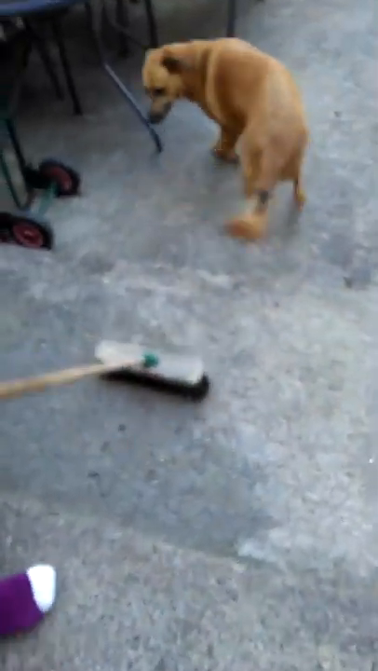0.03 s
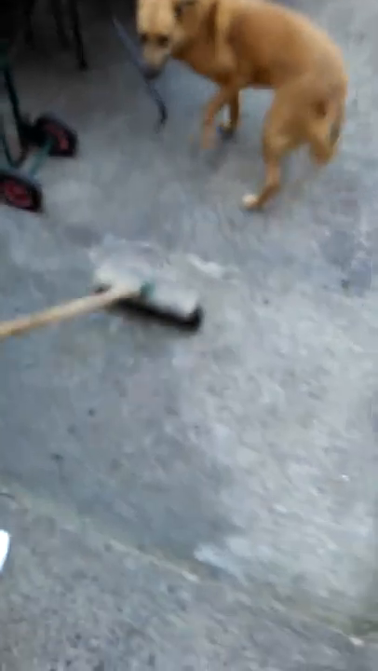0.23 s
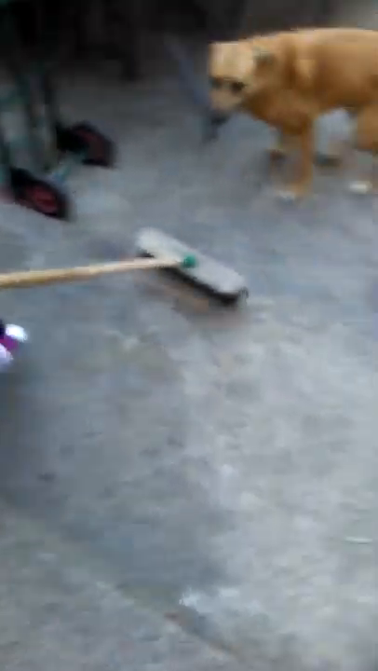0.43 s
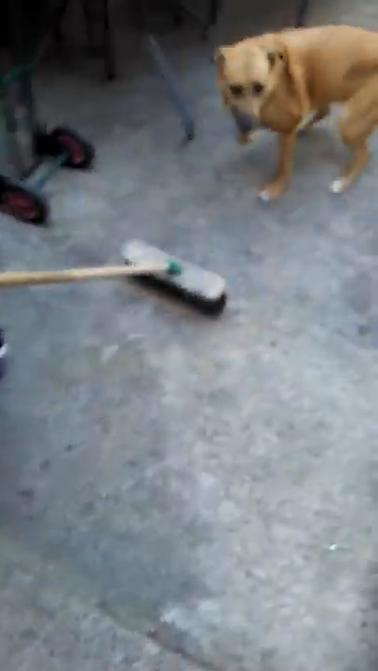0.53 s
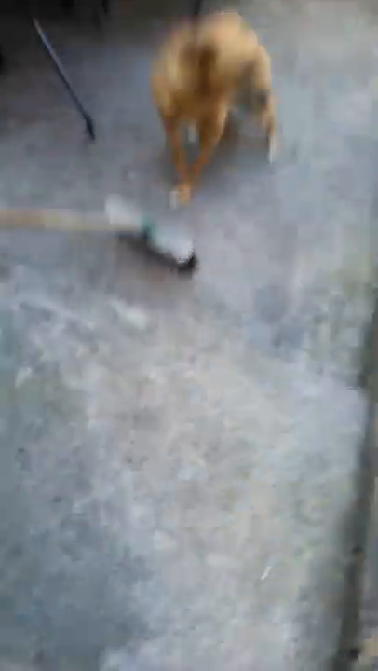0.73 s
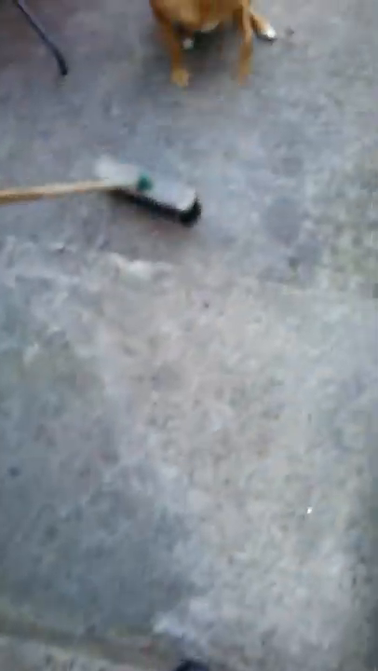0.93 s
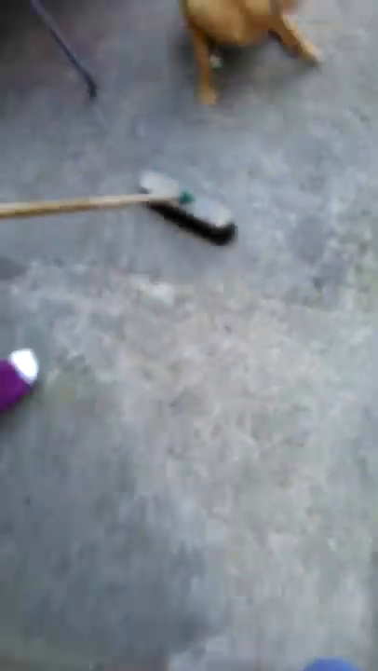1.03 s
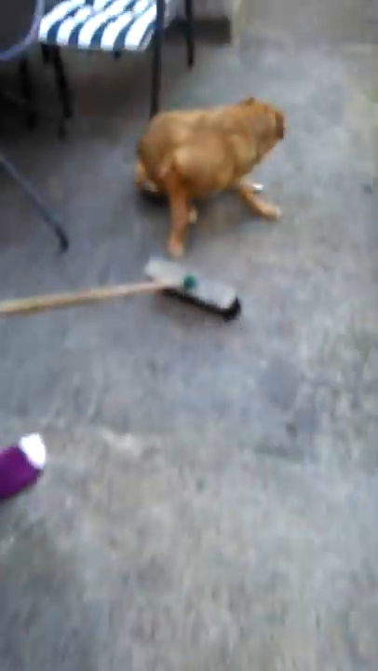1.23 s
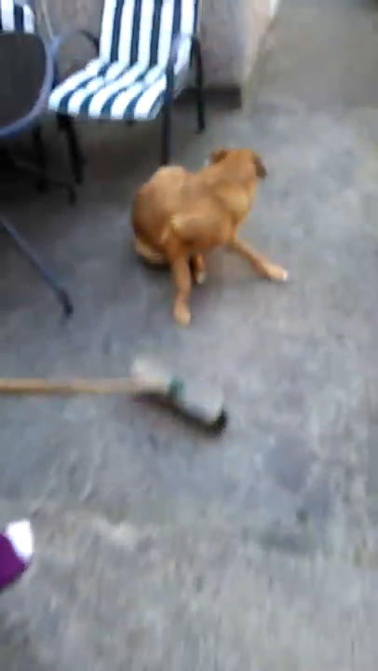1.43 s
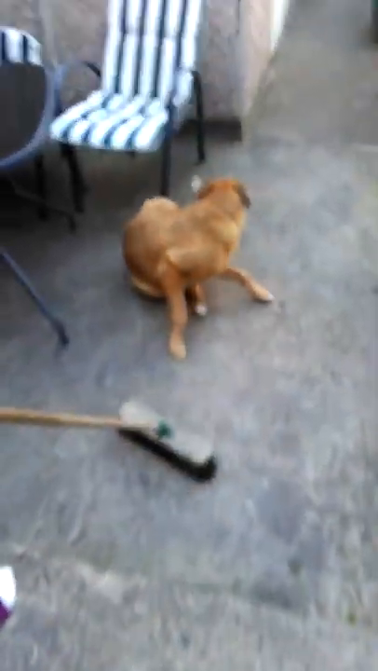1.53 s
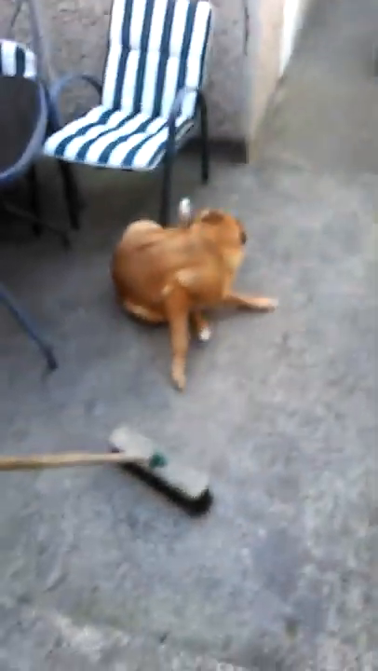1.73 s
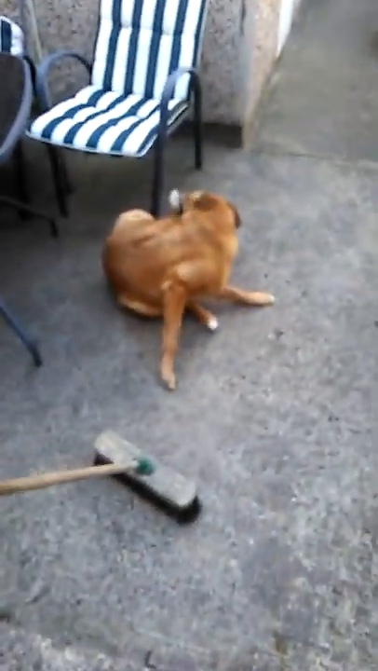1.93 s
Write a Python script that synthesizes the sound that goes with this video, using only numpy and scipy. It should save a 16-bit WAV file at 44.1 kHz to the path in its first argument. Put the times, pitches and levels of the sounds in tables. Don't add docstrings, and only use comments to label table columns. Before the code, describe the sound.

A stiff push broom scrapes over gritty concrete in short harsh strokes with wooden knocks, outdoors

```python
import sys
import numpy as np
from scipy import signal
from scipy.fft import rfft, irfft, next_fast_len
from scipy.io import wavfile
from scipy.ndimage import uniform_filter1d, map_coordinates

SR = 44100
rng = np.random.default_rng(int(sys.argv[2]) if len(sys.argv) > 2 else 0)


def voltage_ratio(decibels):
    exponent = np.asarray(decibels, float) / 20
    return 10 ** exponent


def generate_wav(signal):
    frames = np.transpose(np.atleast_2d(signal))
    scaled = np.clip(frames, -1, 1) * 32767
    pcm = np.round(scaled).astype(np.int16)
    wavfile.write(sys.argv[1], SR, pcm)


N = 88200
TIME = np.arange(N) / SR


def unit(x):
    return x / np.sqrt(np.mean(x ** 2) + 1e-20)


def along(points, hz):
    f, v = np.transpose(points)
    return np.interp(np.log(hz + 1), np.log(f + 1), v)


def curve(points):
    return np.interp(TIME, *np.transpose(points))


def wobble(rate):
    return map_coordinates(rng.standard_normal(2000), [np.arange(N) * rate / SR])


def noise():
    return rng.standard_normal((2, N))


def filtered(x, response):
    m = next_fast_len(N + SR // 2)
    return irfft(rfft(x, m) * response(np.fft.rfftfreq(m, 1 / SR)), m)[..., :N]


def rings(table):
    def response(f):
        total = 0
        for k, (c, w, db) in enumerate(table):
            total = total + (-1) ** k * voltage_ratio(db) * 1j * f * w / (c * c - f * f + 1j * f * w)
        return total
    return response


def hump(middle, half):
    return np.cos(np.pi / 2 * np.clip((TIME - middle) / half, -1, 1)) ** 2


def pressure(contacts):
    rise_from_db = -36
    power = np.zeros(N)
    for s, rise, hold, fall, db in contacts:
        up = np.clip((TIME - s) / max(rise, 1e-4), 0, 1)
        fallen_db = fall * np.clip(TIME - s - rise - hold, 0, None)
        power += (TIME > s) * voltage_ratio(2 * (db + rise_from_db * (1 - up) ** 2 - fallen_db))
    return np.sqrt(power)


def patchy(pair, depth_db, wide, long):
    z = signal.stft(pair, nperseg=512)[2]
    field = uniform_filter1d(rng.standard_normal(z.shape[1:]), size=wide, axis=0)
    field = uniform_filter1d(field, size=long, axis=1)
    return signal.istft(z * voltage_ratio(depth_db * unit(field)), nperseg=512)[1][:, :N]


def outdoors():
    # f/Hz, density/dB
    air_colour = [(25, -10), (70, -11.5), (228, -15.5), (792, -22), (2900, -38.5), (4500, -43.5),
                  (8000, -40.5), (14500, -25.5)]
    # f/Hz, width/Hz, level/dB
    hum_bands = [(100, 52, -66), (149.5, 2.9, -69)]
    hiss_bands = [(2470, 280, -77.5), (4060, 270, -83)]
    deep_band = (38, 10, -72)
    # t/s, level/dB
    hum_swell = [(0.0, -53), (0.38, -51.5), (0.42, -45), (0.52, -59.5), (0.6, -50), (1.04, -59.5),
                 (1.07, -49.5), (1.36, -61.5), (1.53, -57), (1.56, -49), (1.6, -49), (2.0, -64)]
    air_db, air_swell_db = -57, 0.5
    hum_hz, hum_drift_hz, hum_waver_db = 55.2, 3.6, 1.5

    pair = patchy(noise(), 1.8, wide=6, long=12)
    air = unit(filtered(pair, lambda f: voltage_ratio(along(air_colour, f))))
    total = air * voltage_ratio(air_db + air_swell_db * wobble(4.3))
    for c, w, db in hum_bands + hiss_bands + [deep_band]:
        total = total + voltage_ratio(db) * unit(filtered(noise(), lambda f: np.exp(-((f - c) / w) ** 2)))
    phase = 2 * np.pi * np.cumsum(hum_hz + hum_drift_hz * wobble(11.5)) / SR
    level = voltage_ratio(curve(hum_swell) + hum_waver_db * wobble(9.2)) * np.sqrt(2)
    hum = level * np.array([np.sin(phase), np.cos(phase + wobble(6))])
    return total + hum


def ticks():
    # t/s, level/dB
    touches = [
        (.007, -41.5),
        (0.015, -52),
        (0.972, -72),
        (1.058, -31),
    ]
    # f/Hz, width/Hz, level/dB
    point_rings = [(2380, 440, 4), (4760, 560, 0.5)]
    half_s = 0.0012
    gate = sum(voltage_ratio(db) * hump(s + half_s, half_s) for s, db in touches)
    return filtered(gate * noise(), rings(point_rings)) * 3


def scuffs():
    # middle t/s, half length/s, level/dB
    rubs = [
        (0.183, 0.17, -61.5),
        (0.269, 0.1, -45.5),
        (0.645, 0.035, -46),
        (0.715, 0.022, -61),
        (0.941, .03, -57.5),
        (1.62, 0.039, -60.5),
    ]
    # f/Hz, density/dB
    pad_colour = [(150, -38.5), (330, -9), (460, -8.5), (700, -7), (1500, -3.5), (2200, -40), (5000, -19.5)]
    rub = unit(filtered(noise(), lambda f: voltage_ratio(along(pad_colour, f))))
    return rub * sum(voltage_ratio(db) * hump(s, half) for s, half, db in rubs)


def bristles():
    # start t/s, rise/s, hold/s, fall/(dB per s), level/dB
    pushes = [(0.705, 0.018, 0.023, 97, -55), (.4, 0.035, 0.1, 97, -60), (.08, 0.0014, 0.0012, 709, -40.5),
              (0.109, 0.0026, 0.0024, 716, -36), (0.119, 0.05, 0.047, 155, -51.5),
              (0.165, 0.099, 0.077, 296, -28), (.22, 0.077, 0.038, 304, -25),
              (0.525, 0.021, 0.011, 199, -64), (0.623, 0.0086, 0.036, 364, -31.5),
              (1.055, 0.00048, 0.0019, 903, -27.5), (1.06, 0.018, 0.053, 248, -29.5),
              (1.09, 0.049, 0.043, 464, -29.5), (1.512, 0.019, 0.0096, 356, -34.5),
              (1.976, 0.01, .03, 221, -64)]
    # start t/s, rise/s, hold/s, fall/(dB per s), level/dB
    drags = [
        (.8, 0.044, 0.019, 199, -49.5),
        (.9, 0.017, 0.064, 57, -59.5),
        (1.24, 0.032, 0.047, 106, -61.5),
        (1.6, 0.0089, 0.13, 285, -55),
        (1.81, 0.0077, 0.025, 156, -64),
    ]
    # f/Hz, density/dB
    colour = [(180, -21), (350, -25.5), (900, -7.5), (1300, -9.5), (2300, -9.5), (6000, -6.5), (9000, -3.5),
              (14500, -5.5)]
    # f/Hz, width/Hz, lift/dB
    peaks = [(1752, 320, 6), (3290, 280, 3), (4770, 4000, -4)]
    # f/Hz, level/dB
    drag_colour = [(1200, -3), (2200, 5), (3500, 8), (5500, 1), (9000, -2.5), (14000, 1.5)]
    # t/s, bristle song level/dB, low body level/dB
    lean = [(0, -46, 2), (.2, -13.5, 3), (.3, -16.5, -6), (.4, -14.5, 3.5), (.63, -16, -7), (.72, -10, 3),
            (1.06, -10, 17), (1.1, -13, -1.5), (1.2, -7, -5), (1.3, -8, 8), (1.52, -13, 12.5), (2, -15, 0)]
    # f/Hz, width/Hz, level/dB
    song_ring = [(4416, 820, 0)]
    slips_per_s, slip_spread_db, slip_top_db, slip_share = 1500, 4, 11, 0.3
    body_hz, body_grows, full_db = 1240, 0.023, -29.5
    flutter_db = 0.5

    slip_db = np.minimum(slip_spread_db * rng.exponential(size=N), slip_top_db)
    slips = (rng.random(N) < slips_per_s / SR) * voltage_ratio(slip_db)
    slip_power = uniform_filter1d(unit(slips) ** 2, size=16)
    grit = noise() * np.sqrt(1 - slip_share + slip_share * slip_power)

    def head_colour(f):
        lift = sum(db / (1 + (2 * (f - c) / w) ** 2) for c, w, db in peaks)
        return voltage_ratio(along(colour, f) + lift)

    hiss = unit(filtered(patchy(grit, 2.5, wide=4, long=4), head_colour))
    dull = filtered(hiss, lambda f: voltage_ratio(along(drag_colour, f)))
    body = filtered(hiss, lambda f: 1 / (1 + (f / body_hz) ** 4))
    force = pressure(pushes)
    s, song_db, body_db = np.transpose(lean)
    song = voltage_ratio(np.interp(TIME, s, song_db)) * unit(filtered(hiss, rings(song_ring)))
    body_gain = voltage_ratio(np.interp(TIME, s, body_db)) * (force / voltage_ratio(full_db)) ** body_grows
    push = hiss + song + body * (body_gain - 1)
    flutter = voltage_ratio(-1 + flutter_db * (wobble(39.55) + wobble(150)))
    return (push * force + dull * pressure(drags)) * flutter


def taps():
    # t/s, first and second half
    early = [.081, .110, .111, .112, .113, .626, .627, .627, .628, .633, .64, .645, .655, 1.056, 1.077,
             1.14]
    late = [1.445, 1.447, 1.523, 1.5346, 1.536, 1.5366, 1.549, 1.563, 1.577, 1.58, 1.83]
    # f/Hz, level/dB, t60/s
    modes = [(730, -49, .03), (1310, -39, 0.028), (936, -32, 0.042), (359, -33.5, 0.039),
             (650, -36.5, 0.016), (1560, -30.5, 0.071), (1870, -35, 0.046), (470, -39.5, 0.034),
             (910, -32.5, 0.063), (1450, -34, 0.03), (320, -44, 0.17), (833, -37, 0.056), (1505, -33, .05),
             (4420, -28, 0.017), (128, -36.5, 0.35), (122, -42, .15), (278, -35.5, 0.041),
             (1490, -53, 0.024), (303, -31.5, 0.033), (191, -26.5, .06), (840, -40, 0.022),
             (385, -20.5, 0.06), (385, -33.5, 0.041), (305.56, -32, 0.033), (418, -37, 0.023),
             (112, -34.5, 0.19), (284, -49, 0.07)]
    ring = np.zeros(N)
    for s, (hz, db, t60) in zip(early + late, modes):
        after = TIME - s
        ring += (after > 0) * voltage_ratio(db - 60 * abs(after) / t60) * np.sin(2 * np.pi * hz * after)
    return ring * [[1], [.3]]


def knocks():
    # t/s, thud level/dB, clack level/dB, smear/s
    blows = [(0.082, -64, -53, 0.0041), (0.109, -54, -44.5, 0.0018), (.627, -37.5, -39.5, 0.0068),
             (0.639, -55, -43, 0.023), (1.053, -41, -39.5, 0.0048), (1.069, -34.5, -44, 0.0013),
             (1.072, -72, -34.5, 0.003), (1.096, -35.5, -59, 0.0051), (1.276, -52.5, -68, 0.004),
             (1.446, -57.5, -64.5, 0.0028), (1.522, -40, -41, 0.0119), (1.533, -33, -48, 0.0019),
             (1.537, -54, -33.5, 0.0029), (1.543, -46, -43.5, 0.0066), (1.563, -67, -63, 0.01),
             (1.575, -39, -57, 0.0033), (1.599, -62, -63, 0.0034), (1.835, -54, -68, 0.0077)]
    # f/Hz, width/Hz, level/dB
    low_modes = [(114, 49, -1.5), (188, 37, 1), (314, 47, 3.5), (359, 51, 5), (459, 62, 4.5)]
    high_modes = [(642, 89, -1.5), (980, 180, 0.5), (1470, 132, 3), (1920, 850, -6.5), (2600, 840, -7)]
    thud_lift_db, rag_db, clack_lift_db = 54.5, -15, 38

    low, high = np.zeros((2, N + SR)), np.zeros((2, N + SR))
    t = np.arange(SR // 20) / SR
    for s, thud_db, clack_db, smear in blows:
        fade = t / smear * np.exp(-t / smear * 3.79)
        rag = fade * rng.standard_normal((2, len(t))) / np.linalg.norm(fade)
        thud = voltage_ratio(rag_db) * rag + fade / fade.sum() * [[1], [0]]
        click = t == t[round(smear * SR / 4)]
        clack = rag - click * [[1], [.5]]
        span = slice(round(s * SR), round(s * SR) + len(t))
        low[:, span] += voltage_ratio(thud_db + thud_lift_db) * thud
        high[:, span] += voltage_ratio(clack_db + clack_lift_db) * clack
    return filtered(low[:, :N], rings(low_modes)) + filtered(high[:, :N], rings(high_modes))


def sole():
    # start t/s, rise/s, hold/s, fall/(dB per s), level/dB
    rubs = [
        (.457, 0.0023, 0.0024, 400, -57),
        (.47, 0.003, 0.021, 334, -48),
        (.52, .02, 0.11, 250, -66),
        (.74, 0.027, 0.12, 200, -70.5),
    ]
    # f/Hz, width/Hz, level/dB
    rubber = [(470, 113, 1), (937, 120, -1.5), (1456.4, 295, -2)]
    band = rings(rubber)
    rub = unit(filtered(noise(), lambda f: band(f) * abs(band(f))))
    return rub * pressure(rubs)


def rumbles():
    # middle t/s, half length/s, f/Hz, level/dB
    swells = [
        (1.307, 0.088, 100.2, -57),
        (1.416, 0.08, 100, -57.5),
        (1.463, 0.027, 100, -53),
        (1.793, 0.069, 110, -52.5),
        (1.976, 0.047, 110, -57),
        (.85, 0.063, 132.8, -59.5),
    ]
    width_hz = 25
    sway = 2 * np.pi * np.cumsum(width_hz * wobble(45) / 4) / SR
    total = np.zeros(N)
    for s, half, hz, db in swells:
        total += voltage_ratio(db) * hump(s, half) * np.sqrt(2) * np.sin(2 * np.pi * hz * TIME + sway)
    return total * [[1], [.5]]


def judder():
    # middle t/s, half length/s, rate/(slips per s), share of rate lost per s, level/dB
    shakes = [
        (1.71, 0.077, 68, 1.04, -38),
        (1.808, 0.021, 60, 0.39, -50),
        (1.927, 0.053, 67, -2, -54),
    ]
    # f/Hz, width/Hz, level/dB
    handle = [(144, 71, -3.5), (201, 63, 2), (288, 82, -9.5), (329, 29, -12)]
    jitter, scatter_db = 0.025, 1.5
    body = rings(handle)
    out = np.zeros(N)
    for s, half, rate, sag, db in shakes:
        phase = np.cumsum(rate * (1 + jitter * wobble(44) - sag * (TIME - s))) / SR
        slip_now = np.diff(np.floor(phase), prepend=0) > 0
        slips = slip_now * voltage_ratio(scatter_db * rng.standard_normal(N))
        shake = filtered(slips, lambda f: body(f) / (1 + 1j * f / 400) ** 2)
        out += voltage_ratio(db) * hump(s, half) * unit(shake)
    return np.array([out, 0.082 * out])


def yard(x):
    # f/Hz, t60/s
    decay = [(150, 0.33), (1000, 0.12), (5000, 0.097), (12000, 0.054)]
    gap_s, low_hz = 0.011, 506
    hz, t, z = signal.stft(rng.standard_normal((2, SR // 2)), SR, nperseg=256)
    tail = signal.istft(z * voltage_ratio(-60 * t / along(decay, hz)[:, None]), SR, nperseg=256)[1]
    delayed = np.pad(x, (round(gap_s * SR), 0))[None]
    echo = signal.fftconvolve(delayed, tail / np.linalg.norm(tail[0]), axes=1)[:, :N]
    return filtered(echo, lambda f: f / np.hypot(f, low_hz))


def scene():
    near = bristles() + knocks() + taps() + scuffs() + sole() + judder()
    echo_db = -9.5
    return near + ticks() + voltage_ratio(echo_db) * yard(near[0]) + outdoors() + rumbles()


def ports(pair):
    # f/Hz, likeness 0-1
    alike = [(60, 0.96), (150, 1), (400, 0.89), (800, .75), (1400, 0.23), (3000, 0.11), (10000, 0.12)]
    # f/Hz, level/dB
    tilt = [(120, -0.5), (300, 0), (700, 1.5), (1400, 1.5), (2500, 5.5), (4500, 4), (8000, 5.5), (13000, 7)]
    # f/Hz, phase/rad
    lead = [(350, -0.64), (700, -1.17), (1100, -2), (1600, -5.5), (3000, -7)]
    # f/Hz, width/Hz
    cavities = [(4400, 1780), (6000, 1540)]
    # t/s, share 0-1
    shade = [(0, 0), (.2, 0.1), (.45, 0.07), (.65, 0), (.85, 0.22), (1.1, 0.17), (1.2, 0.12), (1.5, 0),
             (2, 0.1)]
    shade_hz = 4700

    def mid_side(hz):
        angle = np.arccos(np.clip(along(alike, hz), 0, 1)) / 2
        return np.array([np.cos(angle), np.sin(angle)])

    half = np.array([[.5], [-.5]])
    c, w = np.transpose(cavities)[:, :, None]

    def port(hz):
        cavity = c * c / (c * c - hz * hz + 1j * hz * w)
        return voltage_ratio(half * along(tilt, hz)) * np.exp(1j * half * along(lead, hz)) * cavity

    mid, side = filtered(pair, mid_side)
    left, right = filtered(np.array([mid + side, mid - side]), port)
    away = np.clip(curve(shade), 0, 1)
    shaded = filtered(left, lambda hz: 1 / (1 + (hz / shade_hz) ** 4))
    return np.array([(1 - away) * left + away * shaded, right])


def low_pass(x):
    return signal.sosfilt(signal.butter(12, 15060, fs=SR, output="sos"), x)


def record(dry):
    top_hz, top_soft_hz, low_cut_hz = 14300, 250, 38

    def limits(hz):
        top = 1 / (1 + np.exp(np.clip((hz - top_hz) / top_soft_hz * 2, -50, 50)))
        return top / np.sqrt(1 + (low_cut_hz / (hz + 1)) ** 6)

    return low_pass(filtered(ports(dry), limits))


dry = scene()
out = record(dry)
generate_wav(out)
```